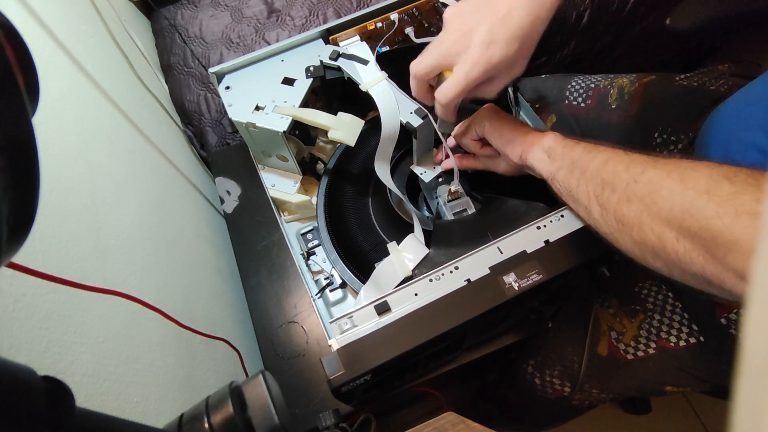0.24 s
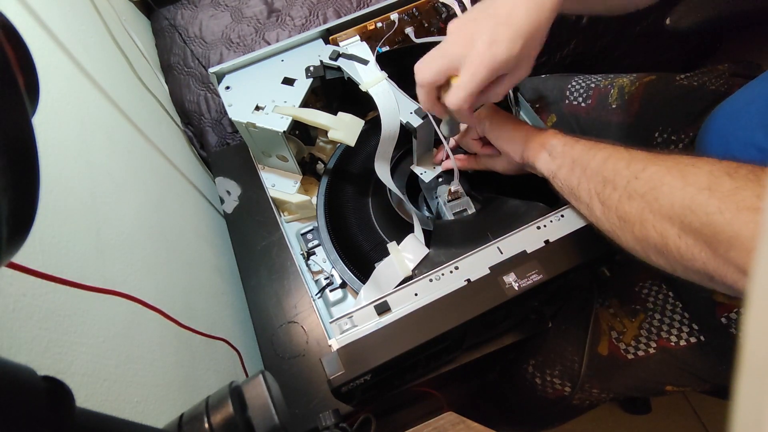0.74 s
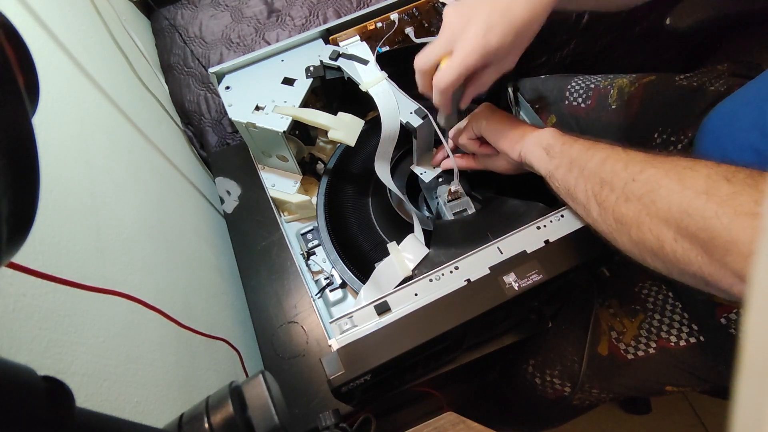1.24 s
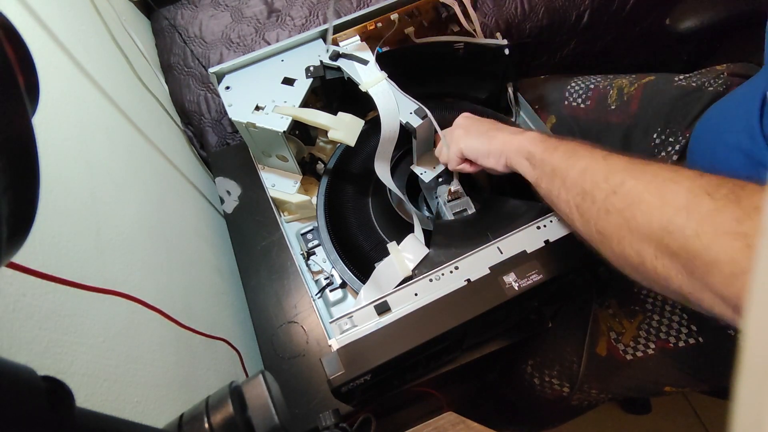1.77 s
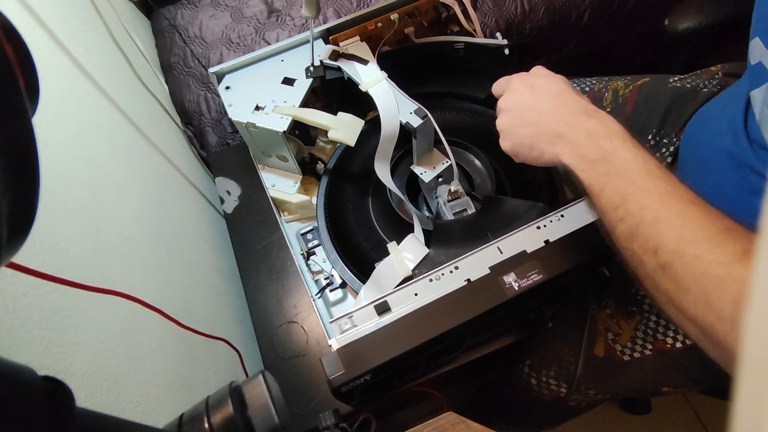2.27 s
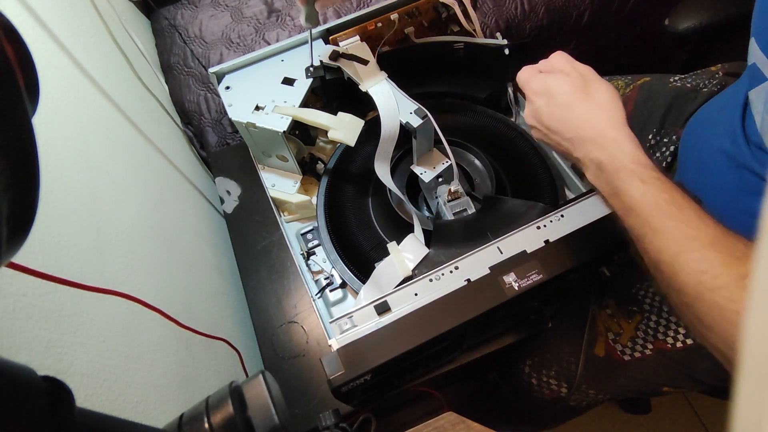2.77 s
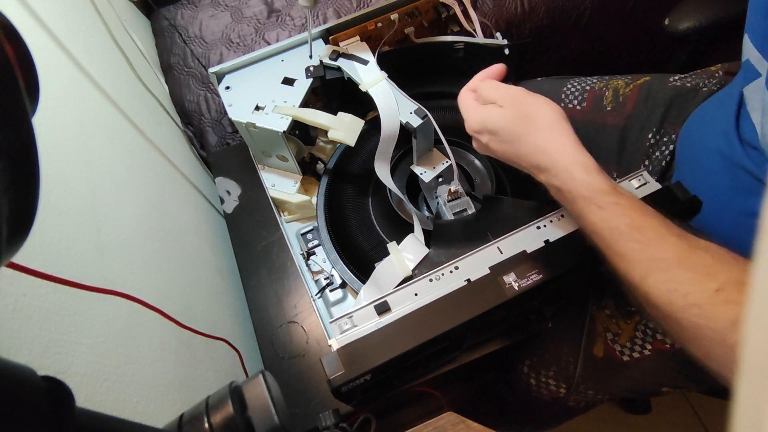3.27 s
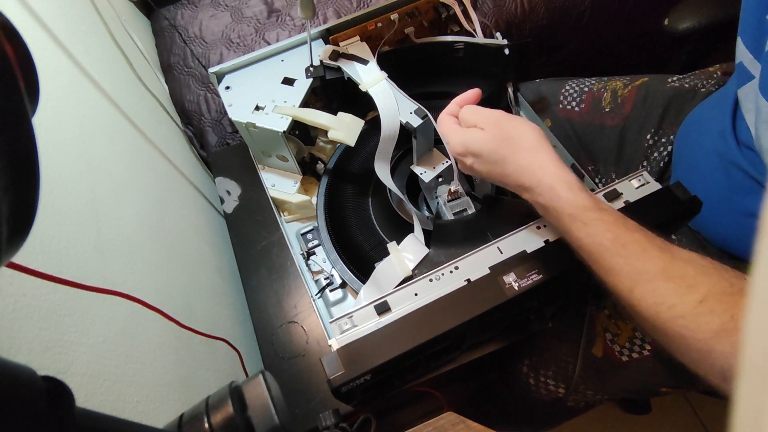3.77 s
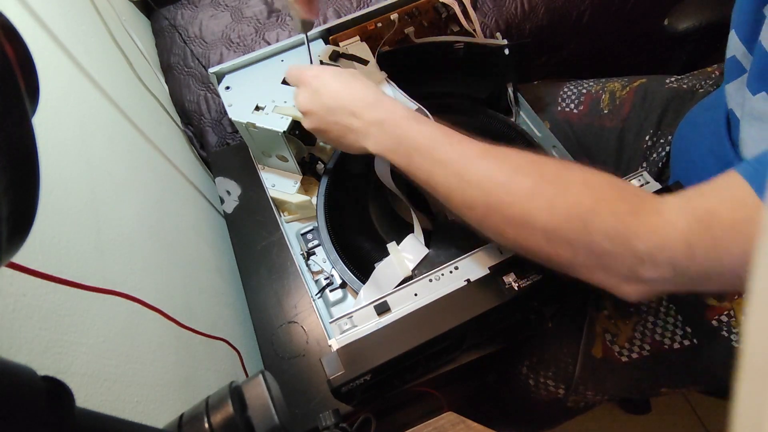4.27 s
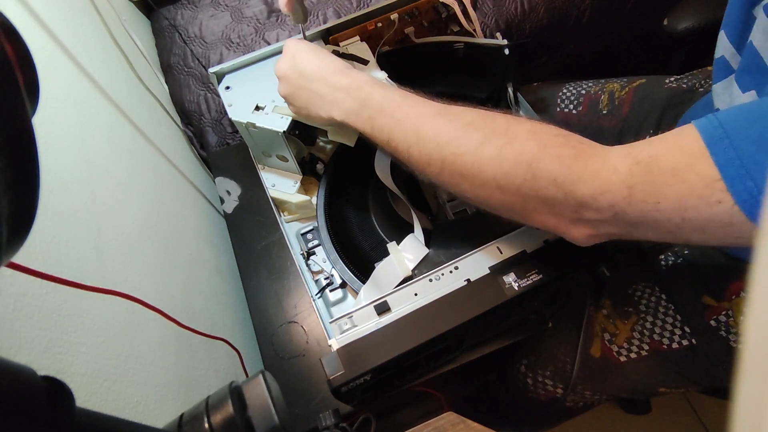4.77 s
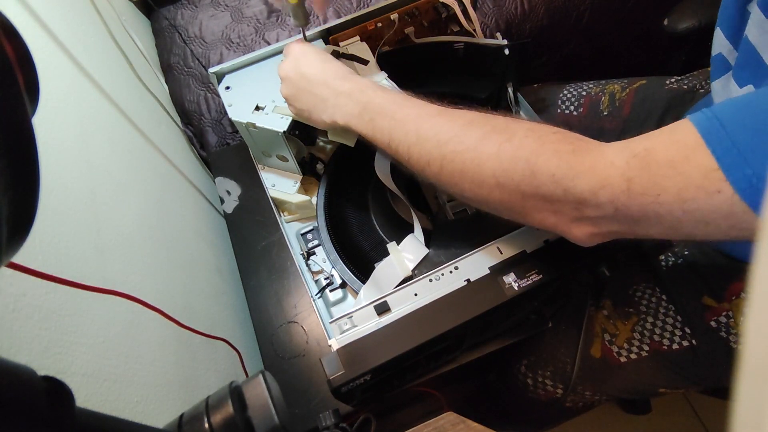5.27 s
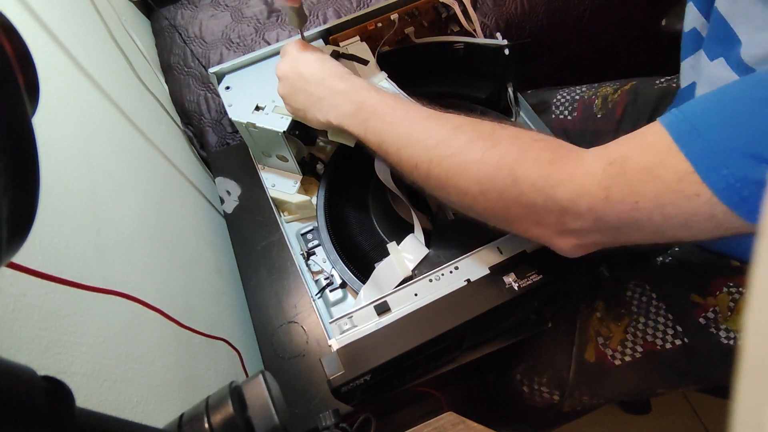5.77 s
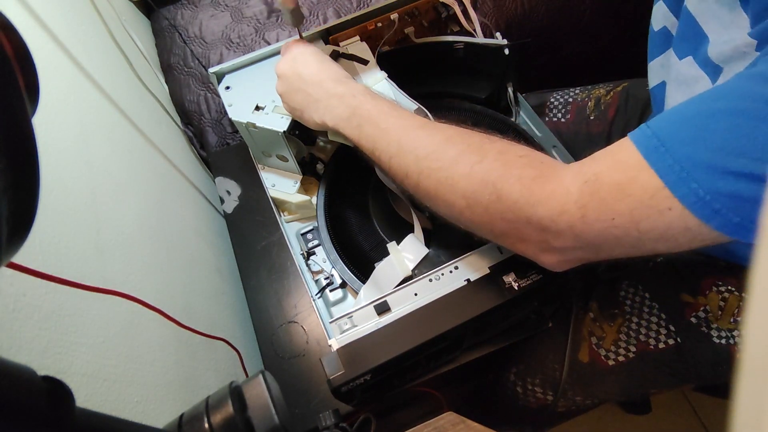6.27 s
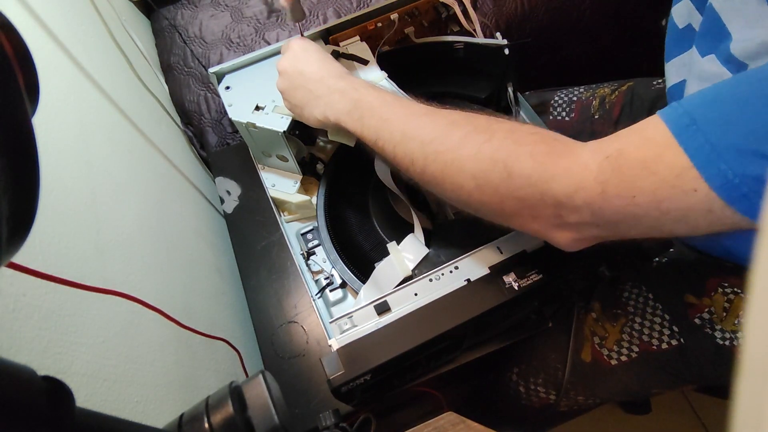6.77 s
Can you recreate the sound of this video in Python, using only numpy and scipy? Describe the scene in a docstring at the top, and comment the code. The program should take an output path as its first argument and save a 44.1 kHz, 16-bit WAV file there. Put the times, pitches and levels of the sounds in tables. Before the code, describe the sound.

Close, dry clunks and clicks of metal and plastic parts inside an opened device, with a brief sleeve rustle and low bench rumble.

```python
"""Working inside an opened device

Hands and a screwdriver work inside an opened device that lies on a bench in a small quiet room.
Every knock or tool tap is a short, blurred burst of dense noise that rings the chassis or the tool.
Further short bursts add the ticks of small hard parts, and bright treble and a stronger ring to some knocks.
A sleeve rustles, the bench rumbles and the microphone hisses: three kinds of filtered noise."""
import sys
import numpy as np
from scipy import signal
from scipy.fft import rfft, irfft
from scipy.io import wavfile
from scipy.ndimage import uniform_filter1d, minimum_filter1d

SR = 44100
rng = np.random.default_rng(int(sys.argv[2]) if len(sys.argv) > 2 else 0)


def unload_wav(signal):
    """Save mono or channel-first audio to the path in sys.argv[1] as 16-bit WAV at rate SR, clipped to [-1, 1]."""
    wavfile.write(
        sys.argv[1],
        SR,
        np.round(np.clip(np.atleast_2d(signal).T, -1, 1) * 32767).astype(np.int16),
    )


N = 309582   # length of the scene in samples
SPAN = 2 ** 14   # room for one burst in samples
GRID_HZ = np.arange(1, SPAN // 2 + 2) * SR / SPAN   # starts one step above 0 Hz

# ways in which the opened chassis rings: f/Hz, width/Hz, level/dB
CHASSIS_MODES = [(131, 41, -1.5), (225.4, 52, -1.5), (309.7, 53, 0), (477, 300, -2), (595.3, 64, 1),
                 (778, 210, -2), (1015, 193, 0), (1274, 310, -2.5), (1450, 94, -4.5), (1560, 190, -9.5),
                 (2249, 280, -22), (2436, 420, -22), (2804, 370, -19), (3143, 410, -17.5),
                 (3610, 550, -23.5), (4320, 770, -27), (4940, 320, -22), (5520, 510, -26),
                 (6390, 2100, -22.5), (6940, 640, -34.5), (8750, 400, -56), (9800, 1100, -62.5),
                 (11000, 980, -43.5), (12400, 1000, -45), (14300, 1900, -41.5)]


def from_db(db):
    """Turn decibels into an amplitude factor."""
    return 10 ** (np.asarray(db) / 20)


def rms_one(x):
    """Scale a signal or spectrum to an rms of 1."""
    return x / np.sqrt(np.mean(np.abs(x) ** 2) + 1e-20)


def resonances(modes, hz):
    """Power response of each mode, one row per mode; squaring it makes steep skirts and dark valleys."""
    centre, width, level_db = np.transpose(modes)[:, :, None]
    plain = (hz * width) ** 2 / ((centre ** 2 - hz ** 2) ** 2 + (hz * width) ** 2)
    return from_db(2 * level_db) * plain ** 2


def causal(power):
    """The minimum-phase filter with this power response: nothing sounds before its cause."""
    cepstrum = irfft(np.log(power + 1e-30) / 2)
    cepstrum[1:SPAN // 2] *= 2
    cepstrum[SPAN // 2 + 1:] = 0
    return np.exp(rfft(cepstrum))


def shaped_noise(gain):
    """Random noise coloured by a gain for each frequency; rms 1."""
    return rms_one(irfft(rfft(rng.standard_normal(N)) * gain, N))


def dense_noise():
    """Noise of dense uneven clicks of random sign; rms 1."""
    clicks_per_s = 12000   # on average
    boost_db = 2.0 * np.minimum(rng.exponential(1, SPAN), 2)
    sizes = rng.standard_normal(SPAN) * from_db(boost_db)
    return rms_one(sizes * (rng.random(SPAN) < clicks_per_s / SR))


def swell(lasts, t60, rise):
    """Loudness curve that rises, holds while the burst lasts, then falls 60 dB in t60 seconds."""
    t = np.arange(SPAN) / SR
    fall = from_db(-60 * np.maximum(t - lasts, 0) / t60)
    return (1 - np.exp(-t / rise)) ** 2 * fall


def add(out, s, sound):
    """Mix one burst into the scene at time s."""
    at = max(round(s * SR), 0)
    out[at:at + SPAN] += sound[:N - at]


def hiss(hz):
    """Steady room tone and microphone noise: random noise with a fixed colour."""
    treble_db = -67   # level of the part above 1500 Hz
    # colour of the noise, only its shape counts: f/Hz, level/dB per Hz
    noise_colour = [(12, -35.5), (20, -5.5), (158, -18), (209, -15.5), (317, -26.5), (397, -18.5),
                    (916, -27), (1320, -31), (1690, -31.5), (1950, -31), (2880, -33), (13700, -33.5),
                    (15800, -39)]
    colour_hz, colour_db = np.transpose(noise_colour)
    colour = from_db(np.interp(np.log(hz), np.log(colour_hz), colour_db))
    treble_share = np.sqrt(np.sum(colour[hz > 1500] ** 2) / np.sum(colour ** 2))
    return from_db(treble_db) / treble_share * shaped_noise(colour)


def rumble(hz, near):
    """Deep noise of the bench shaking under the arms, stronger for a moment after each knock."""
    shake_db, power_fades_s = -27.5, 0.067   # extra shaking, and how slowly its power fades
    # rumble between knocks: t/s, level/dB
    quiet_level = [(0.0, -52.5), (0.92, -63), (1.17, -54), (1.6, -64.5), (3.07, -58), (3.5, -71),
                   (4.2, -54.5), (5.47, -62.5), (7.02, -53.5)]
    times, levels_db = np.transpose(quiet_level)
    fade = np.exp(-1 / (power_fades_s * SR))
    after_knocks = np.sqrt(signal.lfilter([1 - fade], [1, -fade], near ** 2))
    between = from_db(np.interp(np.arange(N) / SR, times, levels_db))
    level = between + from_db(shake_db) * after_knocks
    bench_power = resonances([(26, 25, 0), (55.7, 26, -2)], hz).sum(axis=0)
    return level * shaped_noise(np.sqrt(bench_power))


def room(x):
    """A dull tail of dense reflections: the sound is smeared by fading, filtered noise."""
    t60_s, low_cut_hz, wall_cut_hz = 0.8, 139, 480
    t = np.arange(SR) / SR
    tail = rng.standard_normal(SR) * from_db(-60 * t / t60_s)
    tail = tail * (t > .01)   # the first reflections need 10 ms
    walls = signal.butter(1, [low_cut_hz, wall_cut_hz], "band", fs=SR, output="sos")
    tail = signal.sosfilt(walls, tail)
    return signal.fftconvolve(x, tail / np.sqrt(np.sum(tail ** 2)))[:N]


def rustle(hz):
    """A sleeve rubs over the edge: hiss in a high resonance swells and fades with each stroke."""
    rise_db_per_s, fall_db_per_s = 84, 86
    # strokes of the sleeve: t/s of the peak, level/dB
    sleeve_strokes = [(.28, -66.5), (4.3, -46.5), (5.03, -77)]
    # colour of the cloth: f/Hz, width/Hz, level/dB
    cloth = [(3700, 1500, -14), (6000, 2500, -14), (7900, 1500, 0)]
    t = np.arange(N) / SR
    level = np.zeros(N)
    for s, peak_db in sleeve_strokes:
        drop_db = np.maximum(rise_db_per_s * (s - t), fall_db_per_s * (t - s))
        level += from_db(peak_db - drop_db)
    return level * shaped_noise(np.sqrt(resonances(cloth, hz).sum(axis=0)))


def ringing_bursts(rows, modes, t60):
    """Short bursts of dense noise, all filtered by the same set of resonances."""
    rise_share, tail_per_length = 0.33, 2.2   # longer bursts die away more slowly
    out = np.zeros(N)
    ring = rms_one(causal(resonances(modes, GRID_HZ).sum(axis=0)))
    for s, level_db, lasts in rows:
        envelope = swell(lasts, t60 + tail_per_length * lasts, rise_share * lasts)
        push = rfft(dense_noise() * envelope)
        add(out, s, from_db(level_db) * irfft(ring * push))
    return out


def ticks():
    """Small hard parts tick or scrape and ring high and briefly."""
    # the ticks: t/s, level/dB, lasts/s
    tick_times = [(3.059, -58.5, 0.0045), (3.787, -34, 0.0045), (4.166, -42, .002), (4.188, -43, 0.0027),
                  (4.27, -23.5, 0.0068), (4.295, -26, .003), (4.336, -28.5, 0.0021), (4.361, -38.5, .003),
                  (5.526, -54.5, 0.013), (5.59, -65, .02), (5.728, -50, 0.039), (6.428, -59, 0.024),
                  (6.512, -43.5, 0.0074)]
    # ringing of the small parts: f/Hz, width/Hz, level/dB
    small_parts = [(2480, 620, -2.5), (3740, 550, 5.5), (5700, 1600, -2.5), (7520, 520, 5.5),
                   (8500, 700, -11.5)]
    return ringing_bursts(tick_times, small_parts, t60=.016)


def knock_treble():
    """Bright treble of the sharpest knocks: short bursts in the five highest chassis modes."""
    # the bursts: t/s, level/dB, lasts/s
    treble_times = [(0.96, -51.5, 0.022), (1.11, -54, .012), (1.388, -74, .012), (1.806, -39.5, 0.022),
                    (2.839, -39.5, 0.012), (3.786, -57.5, .01), (4.201, -49.5, 0.0071), (4.269, -53, .014),
                    (4.292, -58, .012)]
    return ringing_bursts(treble_times, CHASSIS_MODES[-5:], t60=.07)


def knock_ring():
    """Some knocks ring more strongly between about 1.4 and 5 kHz: extra bursts in resonances there."""
    # the bursts: t/s, level/dB, lasts/s
    ring_times = [(2.364, -19, 0.0086), (2.842, -16, 0.0052), (2.944, -48.5, 0.034), (3.058, -51, 0.0071),
                  (3.555, -60, 0.0092), (3.753, -19.5, 0.0094), (4.004, -24.5, 0.0074),
                  (4.201, -18, 0.0072), (4.292, -27.5, 0.009), (4.826, -49, 0.025), (4.998, -48.5, 0.011),
                  (5.068, -45.5, 0.004), (5.85, -62.5, 0.025), (6.2, -43.5, 0.025), (6.235, -36, 0.0079),
                  (6.752, -54, 0.0097)]
    # the resonances: f/Hz, width/Hz, level/dB
    ring_modes = [(1463, 120, -1.5), (1792, 270, -4.5), (2030, 190, -6.5), (2837, 240, -8), (3117, 170, -8),
                  (3474, 260, -11), (5016, 180, -15)]
    return ringing_bursts(ring_times, ring_modes, t60=.14)


def blows(rows, modes, strike_db, upper_hz, upper_db, sizzle_db):
    """Each burst rings the body and the touched part; its levels share the power over the bands."""
    mode_spread_db = 2.7   # each blow finds other modes strong
    part_sharpness, part_db = 10.5, 7.5   # sharpness is pitch divided by width
    rise_share, longest_rise_s = 0.6, 0.0065   # the shorter a burst, the more abruptly it sets in
    strike_s = 0.0013   # a peak stands out of the burst for about this long
    # quieter knocks are given a longer fade
    shortest_t60_s, longer_s_per_db, loud_db = 0.15, .003, -34.5
    upper_follows = 0.68   # share of the hardness that the upper band takes up
    # borders between the bands thud, case, middle, upper, hard and sizzle: f/Hz
    band_edges = [80, 170, 750, 1800, 4200, 8000, 15800]
    # filter order of each band: the higher, the steeper
    band_orders = [3, 3, 3, 3, 9, 9]

    bands = []
    for order, low, high in zip(band_orders, band_edges, band_edges[1:]):
        band = signal.butter(order, [low, high], "band", fs=SR, output="sos")
        bands.append(np.abs(signal.sosfreqz(band, GRID_HZ, fs=SR)[1]) ** 2)
    bands = np.array(bands)
    rings = resonances(modes, GRID_HZ)
    t = np.arange(SPAN) / SR
    out = np.zeros(N)
    for s, level_db, thud, case, hard, part_hz, lasts in rows:
        body = from_db(2 * rng.normal(0, mode_spread_db, len(modes))) @ rings
        part_modes = [(hz, hz / part_sharpness, part_db) for hz in (part_hz, upper_hz)]
        body = body * (1 + resonances(part_modes, GRID_HZ).sum(axis=0))

        rise = np.clip(rise_share * lasts, .001, longest_rise_s)
        t60 = shortest_t60_s + longer_s_per_db * max(loud_db - level_db, 0)
        strike = np.exp(-((t - 2 * rise) / strike_s) ** 2)
        envelope = swell(lasts, t60, rise) * (1 + from_db(strike_db) * strike)
        push = rfft(dense_noise() * envelope)

        # scale every band towards the energy that its level asks for
        found = np.mean(bands * body * np.abs(push) ** 2, axis=1) / np.sum(envelope ** 2)
        shares_db = np.array([thud, case, 0, upper_db + upper_follows * hard, hard, sizzle_db + hard])
        band_gains = from_db(level_db + shares_db) ** 2 / found
        sound = irfft(push * causal(body * (band_gains @ bands)))
        add(out, s - 1.5 * rise, sound)   # starts early, as the burst needs time to rise
    return out


def tool_taps():
    """The screwdriver chatters in a screw head: short bursts of noise ring the tool."""
    # the taps: t/s, level/dB at 750-1800 Hz, then relative to it thud/dB, case/dB, hardness/dB (treble
    # above about 4 kHz); pitch of the touched part f/Hz, lasts/s
    taps = [(0.025, -57.5, 15.5, 4.5, -16, 1030, 0.015), (0.072, -41.5, -35, -24, -38, 1040, 0.018),
            (0.091, -27, -50, -38, -35, 1040, 0.012), (0.111, -23, -48, -13.5, -35, 980, 0.0086),
            (0.14, -33.5, -21, 3, -19, 854, 0.0043), (0.249, -38, -10, -21, -25.5, 1000, 0.0095),
            (0.29, -39.5, -1, 3, -25, 1040, 0.0074), (0.372, -27, -27, -28, -32.5, 1075, 0.0076),
            (0.403, -41.5, -4.5, -11, -19.5, 1080, 0.005), (0.56, -61, 3.5, 1.5, -14, 1050, .013),
            (0.612, -51.5, -16, -24.5, -33, 945, 0.0091), (0.82, -61, -12, -11, -35, 1010, 0.011),
            (0.879, -61, -12.5, -10, -32, 980, .015), (1.394, -33, -41.5, -17, -21.5, 1073, 0.02)]
    # ringing of the tool: f/Hz, width/Hz, level/dB
    tool_modes = [(132.5, 49, -10.5), (353, 265, -9), (767, 110, -14.5), (968, 297, -7), (1248, 93, -10.5),
                  (2280, 130, -30.5), (3230, 440, -32), (3670, 640, -32), (4830, 610, -41.5),
                  (5600, 800, -39.5), (6700, 1400, -41), (8800, 1500, -61)]
    return blows(taps, tool_modes, strike_db=-4.0, upper_hz=2225, upper_db=4, sizzle_db=-12.5)


def knocks():
    """Hands and tool knock on the device: each short, blurred burst of dense noise rings the chassis."""
    # the knocks: t/s, level/dB at 750-1800 Hz, then relative to it bench thud/dB, case/dB, hardness/dB
    # (treble above about 4 kHz); pitch of the touched part f/Hz, lasts/s
    knock_times = [(0.966, -19.5, 10, 2, -8, 813, 0.012), (1.115, -19, 5.5, -5.5, -11, 942, 0.016),
                   (1.224, -47, 9, -1, 0, 1270, .005), (1.815, -14.5, -28, -1.5, -14.5, 990, 0.012),
                   (2.372, -17.5, -46, 2, -19, 1483, 0.019), (2.849, -12, -31.5, 1, -8, 1510, 0.011),
                   (2.949, -40.5, -32, 4.5, -10, 458, 0.014), (3.062, -48, -27, -31, -19.5, 1500, 0.0066),
                   (3.56, -47, -32, 1.5, -31, 483, 0.0093), (3.62, -64.5, -30.5, -7.5, -39, 1285, .07),
                   (3.759, -12.5, -34, 2, -12, 596, 0.0093), (3.791, -15.5, -17, 0.5, -18, 484, 0.0096),
                   (4.008, -11, -7, 1.5, -20.5, 585, .012), (4.205, -13.5, -16.5, 2.5, -12, 1524, 0.0046),
                   (4.274, -23, -2.5, 4.5, -4, 1260, .008), (4.296, -24.5, -10, 4.5, -7, 990, 0.0058),
                   (4.508, -53.5, -18.5, 1, -24, 960, .0085), (4.618, -55.5, -30, 9, -15, 1040, 0.0091),
                   (4.712, -33.5, 0.5, 8, -16, 454, 0.043), (4.8, -38.5, -10, 8, -26, 687, 0.0055),
                   (4.832, -37.5, -8, -1.5, -23.5, 1220, 0.014), (4.955, -28, -23.5, -11, -24, 1385, 0.012),
                   (5.002, -39.5, -10, -3, -13, 1470, 0.01), (5.051, -33.5, -26, -0.5, -26, 900, .014),
                   (5.074, -44.5, -23, 5, -22, 564, .012), (5.266, -56, -26, 2.5, -32, 613, 0.013),
                   (5.346, -44, -22, -10, -40.5, 990, 0.009), (5.375, -36, -35.5, -5.5, -46, 996, 0.007),
                   (5.565, -56.5, -18, 10.5, -19, 479, 0.007), (5.663, -56.5, -9, 4, -41, 720, 0.025),
                   (5.71, -49, 7, 12, -19.5, 480, 0.01), (5.846, -59, -15.5, -13, -23.5, 1910, 0.057),
                   (5.922, -43.5, -37, -6.5, -51.5, 1160, 0.028), (6.03, -46, -42, 11.5, -35, 502, 0.012),
                   (6.07, -56, -18.5, 1, -42, 517, 0.0083), (6.202, -24, -41.5, 1, -37.5, 704, 0.036),
                   (6.24, -34.5, -23, 10, -17, 492, 0.0098), (6.406, -53.5, -3, -13, -18, 1280, .005),
                   (6.429, -59.5, 5, 23, -3, 560, 0.0077), (6.479, -49.5, -4, 15, -24, 670, 0.008),
                   (6.519, -27.5, -11.5, 2, -25, 1260, 0.011), (6.673, -47.5, -2, -11, -27, 940, .012),
                   (6.733, -44, -14.5, 7.5, -30.5, 890, 0.012), (6.757, -23.5, -30.5, 6, -28, 477, 0.01),
                   (6.79, -36, -8.5, 1, -28, 964, 0.0075), (6.933, -46, -5, -21, -26, 1130, 0.014),
                   (6.967, -51.5, -29.5, 2, -21, 1240, 0.0071), (6.997, -23, -45, 3, -31.5, 744, 0.023)]
    return blows(knock_times, CHASSIS_MODES, strike_db=-7.0, upper_hz=2027, upper_db=-1.5, sizzle_db=-37.5)


def scene():
    """Mix the knocks, taps and ticks with their room tail, the sleeve and the background noises."""
    room_db = -36.5
    hz = np.arange(1, N // 2 + 2) * SR / N   # starts one step above 0 Hz
    near = knocks() + tool_taps() + ticks() + knock_treble() + knock_ring()
    background = rustle(hz) + hiss(hz) + rumble(hz, near)
    return (near + from_db(room_db) * room(near) + background)[None]


def record(dry):
    """A limiter that looks ahead holds the loudest knocks under a ceiling; then the top is cut steeply."""
    ceiling, limiter_samples, cutoff_hz = .88, 441, 16100
    allowed = np.minimum(1, ceiling / (np.abs(dry) + 1e-9))
    lowest = minimum_filter1d(allowed, size=2 * limiter_samples)
    gain = uniform_filter1d(lowest, size=limiter_samples)   # smooth the gain changes
    top_cut = signal.cheby2(20, 70, cutoff_hz, fs=SR, output="sos")
    return signal.sosfilt(top_cut, dry * gain)


dry = scene()
out = record(dry)
unload_wav(out)
```